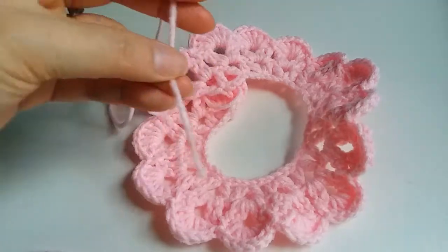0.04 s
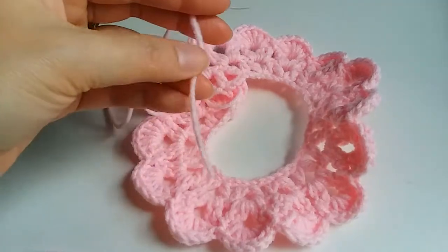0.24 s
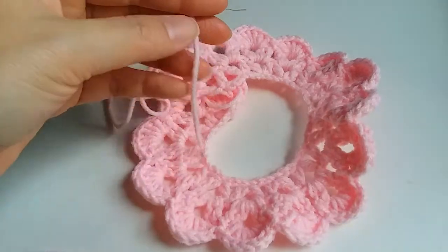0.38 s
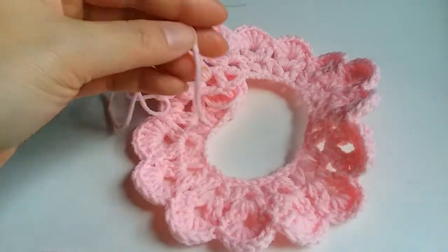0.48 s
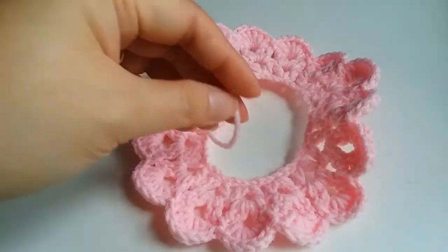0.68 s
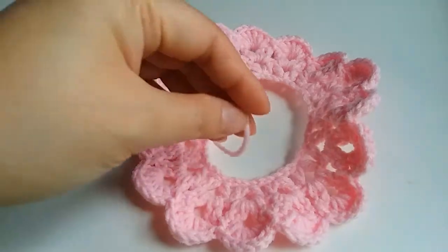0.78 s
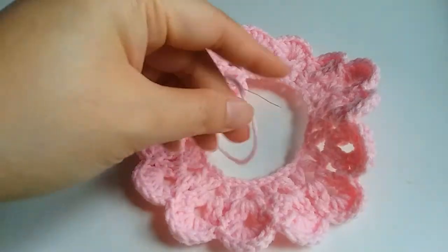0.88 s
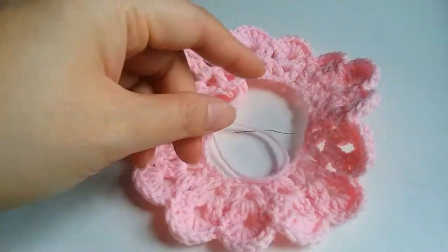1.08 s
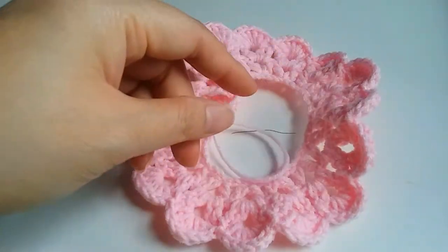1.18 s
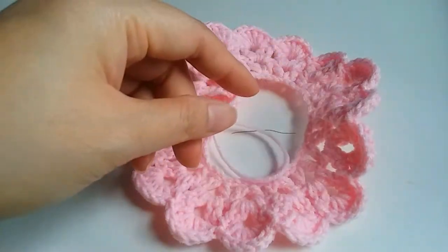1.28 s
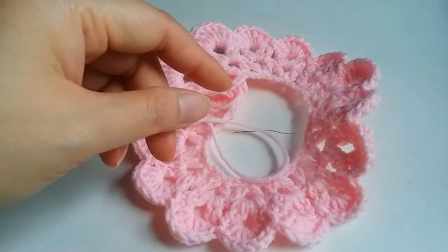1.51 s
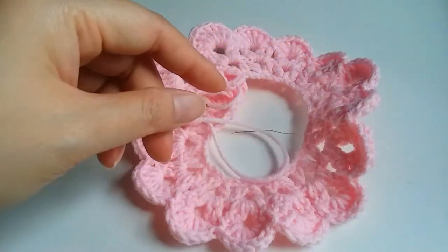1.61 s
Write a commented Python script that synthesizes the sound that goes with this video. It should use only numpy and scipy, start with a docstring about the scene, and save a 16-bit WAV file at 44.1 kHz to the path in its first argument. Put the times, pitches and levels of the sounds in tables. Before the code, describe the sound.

A few light tool clicks on a tabletop, then soft rustling of needle and yarn.

```python
"""Small tools on a table

Hard tools clack down close by and a little to the right: heavily damped pulses with quick early echoes.
Some blows excite the modes of thin steel and of the table top, which thuds. Among the clacks, yarn and
needle rustle through the fingers by stick-slip friction; at the end the hand softly bumps the table.
A small room reflects the clacks and the rustle, over a low rumble and faint hiss."""
import sys
import numpy as np
from scipy import signal
from scipy.fft import rfft, irfft
from scipy.io import wavfile
from scipy.ndimage import uniform_filter1d

SR = 44100
rng = np.random.default_rng(int(sys.argv[2]) if len(sys.argv) > 2 else 0)


def inscribe(sig):
    """Save sig as 16-bit PCM at rate SR to the path in sys.argv[1].

    A 1-D sig is mono; a 2-D sig holds one channel per row.
    Samples are clipped to [-1, 1] before scaling.
    """
    pcm = np.round(np.clip(np.atleast_2d(sig).T, -1, 1) * 32767)
    wavfile.write(sys.argv[1], SR, pcm.astype(np.int16))


N = 72765
T = np.arange(N) / SR
HZ = np.fft.rfftfreq(N, 1 / SR)

# background spectrum (frequency [Hz], relative level [dB])
BACKGROUND_SPECTRUM = [(20, -61), (35, -7.5), (59, -6), (84, -4), (140, -11), (277, -23.5), (754, -29),
                       (2000, -31.5), (4490, -35), (16000, -34.5)]
# left-right likeness of the background (frequency [Hz], correlation [0-1])
BACKGROUND_CORRELATION = [(100, 0.65), (400, 0.34), (1500, 0.16), (12000, 0.033)]
# tool clacks and their quick early echoes
# (time [s], relative level [dB], centre [Hz], treble [dB], bass [dB])
CLACKS_AND_ECHOES = [(.2050, 4.5, 2070, -12, -6), (0.2224, -18.5, 2900, -7.5, 2),
                     (0.2276, -13, 2520, -2, 6.5), (0.2992, -3.5, 2500, 7.5, -4),
                     (0.3014, 0.5, 2174, 4, -4.5), (0.318, -15.5, 2300, -2, 6),
                     (0.3232, -13.5, 2485, -2.5, 8), (0.3376, -9.5, 2300, 0, 8),
                     (0.3412, -13, 2324, 2.5, 20), (0.3603, -14, 2300, -11, 13.5),
                     (0.4067, -7.5, 2045, -3, -2.5), (0.4155, -13.5, 2150, -1.5, 0.5),
                     (0.447, -17, 2200, 2.5, 1.5), (.4695, -24, 2900, 2, -5), (0.483, -21, 3000, 4, -10),
                     (0.4905, -24, 3000, 8, 0), (0.5065, -22, 2760, 5, 8), (.5252, -25, 2387, 5, 14),
                     (.543, -23, 2300, 1, 6), (0.5646, -12.5, 2400, 3.5, 18.5),
                     (0.5709, -7, 2600, -2.5, -3.5), (0.6024, -2, 2600, 2, 9),
                     (0.7226, -25.5, 2500, -10, -12), (0.8519, -22.5, 2430, -1.5, -10),
                     (0.9592, -21, 2900, -1, -2), (0.9624, -14.5, 2950, 1, 1), (0.9698, -19, 2745, 6, 4.5),
                     (0.9719, -27, 2600, 5, 11)]
# spectrum of a clack (frequency over centre [ratio], level [dB])
CLACK_SPECTRUM = [(.3, -18.5), (.5, -16), (.75, -1), (1, 3.5), (1.35, -5.5), (1.8, -10), (2.6, -19),
                  (4, -23.5), (7, -35)]
# shading at the left microphone (frequency [Hz], gain [dB])
LEFT_SHADOW = [(200, -2.5), (1000, -4), (2000, -13), (2800, -5), (4500, -5), (8500, -39.5), (14000, -5.5)]
# reverberation time (frequency [Hz], t60 [s])
ROOM_DECAY = [(100, 0.35), (300, 0.42), (800, .21), (2200, 0.16), (5000, 0.21), (13000, 0.15)]
# colour of the reverberation (frequency [Hz], gain [dB])
ROOM_RESPONSE = [(150, -2), (900, -3), (2000, -3.5), (3200, -3), (6000, -2), (13000, 2)]
# blows that shake the table (time [s], level [dB], gain of the upper modes [dB])
TABLE_BLOWS = [(0.206, -30, -10), (0.299, -47.5, 13.5), (0.334, -37, 3.5), (0.406, -48, 7),
               (0.562, -48.5, 6)]
# modes of the table top (frequency [Hz], level [dB], t60 [s])
TABLE_MODES = [(104, 2, .17), (118, -7, .13), (158, -9, .14), (255, -4, .15), (312, -8, .12),
               (391, -3, .15), (500, -8, .1)]
# rubbing of yarn and needle (time [s], relative level [dB])
RUB_ENVELOPE = [(.21, -39.5), (.29, -49), (.33, -37.5), (.39, -56.5), (.43, -41.5), (.485, -40),
                (.505, -70.5), (.55, -42.5), (.574, -27), (.595, -41.5), (.64, -40), (.68, -53),
                (.715, -53.5), (.785, -47), (.845, -58), (.855, -45), (.895, -56.5), (.92, -46),
                (.965, -45.5), (1.03, -66.5), (1.09, -71.5)]
# colour of the rubbing (frequency [Hz], level [dB])
RUB_SPECTRUM = [(30, -33.5), (120, -16.5), (300, -16.5), (700, -22.5), (1200, -12), (1600, -4.5), (2200, 0),
                (3100, -3.5), (4500, -12), (6500, -19), (10000, -23.5), (16000, -35.5)]
# modes of the thin steel and of the needle (frequency [Hz], level [dB], t60 [s])
STEEL_MODES = [(4932, -1, .2), (7790, -8, .14), (8655, 4, .115), (11280, -14, .15), (13280, -1.5, .14),
               (14770, -13, .14)]
NEEDLE_MODES = [(5140, -2, .14), (9141, -4.5, .27), (9981, 1, .12), (14730, 6, .085)]
# blows on the steel and on the needle (time [s], level [dB], place along the length [0-1])
STEEL_STRIKES = [(.2990, -42, .1), (.3410, -47, .3), (.4065, -48, .44)]
NEEDLE_TOUCHES = [(.8630, -60, .5), (.9615, -48, .28)]
# steel sliding, then scraping on the table (time [s], level [dB])
SLIDE_ENVELOPE = [(.403, -73.5), (.415, -40.5), (.45, -48), (.485, -46), (.505, -61)]
SCRAPE_ENVELOPE = [(.47, -81), (.515, -41), (.545, -54.5), (.57, -40), (.63, -42), (.68, -111)]
# resonances of the snap (centre [Hz], half-width [Hz], level [dB])
SNAP_PEAKS = [(12800, 900, 1), (15100, 900, -2)]
# nudges of the hand (time [s], duration [s], level [dB], pitch [Hz])
HAND_BUMPS = [(1.315, 0.16, -67.5, 335.5), (1.361, 0.084, -47, 84.1), (1.452, 0.072, -51, 78.5),
              (1.588, 0.085, -55.5, 69.5)]


def amp(db):
    """Amplitude grows tenfold every 20 dB."""
    return 10 ** (np.asarray(db) / 20)


def unit(x):
    """Normalisation to rms 1."""
    return x / np.sqrt(np.mean(x ** 2) + 1e-20)


def read(points, hz):
    """Interpolation on a log-frequency axis."""
    f, value = np.transpose(points)
    return np.interp(np.log(hz + 0.00104), np.log(f), value)


def envelope(points):
    """Gain interpolated in decibels, silent outside the points."""
    return amp(np.interp(T, *np.transpose(points), left=-200, right=-200))


def peak(hz, centre_hz, width_hz):
    """A resonance curve in dB, 6 dB down at width_hz from its centre."""
    return -20 * np.log10(1 + ((hz - centre_hz) / width_hz) ** 2)


def add(mix, s, sound):
    """Superposition: a sound joins the mix at time s."""
    part = mix[max(round(s * SR), 0):][:len(sound)]
    part += sound[:len(part)]


def impulse(db):
    """Minimum phase: the causal pulse that has this spectrum."""
    log_gain = np.log(amp(np.maximum(np.r_[db, db[-2:0:-1]], -100)))
    return np.fft.ifft(np.exp(np.conj(signal.hilbert(log_gain)))).real


def background(level_db=-61.5):
    """Correlation falls with frequency: a fairly central rumble lies under a wide hiss."""
    left, independent = rfft(rng.standard_normal((2, N)))
    correlation = read(BACKGROUND_CORRELATION, HZ)
    right = correlation * left + np.sqrt(1 - correlation ** 2) * independent
    return amp(level_db) * unit(irfft(np.array([left, right]) * amp(read(BACKGROUND_SPECTRUM, HZ)), N))


def clacks(gain_db=16, treble_hz=4250, bass_hz=1080, graze_db=-24, graze_s=.0012):
    """Heavy damping: each clack or early echo is one pulse.
    Hard contact adds treble, a heavy blow bass; pulses below graze_db mostly smear into a graze."""
    out, hz, t = np.zeros(N), np.linspace(1, SR / 2, 1025), T[:1024]
    low_cut = 10 * np.log10(1 + (80 / hz) ** 2)
    for s, db, centre_hz, treble_db, bass_db in CLACKS_AND_ECHOES:
        treble = treble_db / (1 + (treble_hz / hz) ** 4)
        bass = bass_db / (1 + (hz / bass_hz) ** 4)
        colour = read(CLACK_SPECTRUM, hz / centre_hz) + treble + bass - low_cut
        pulse = amp(gain_db + db) * impulse(colour)
        scatter = rng.standard_normal(len(t)) * amp(-60 * t / .011) * (t > .0005)  # t60 of 11 ms
        graze = rng.standard_normal(len(t)) * t * np.exp(-2 * t / graze_s)
        clean_share = 1 / (1 + amp(graze_db - db) ** 2)
        force = np.sqrt(clean_share) * (t == 0) + np.sqrt(1 - clean_share) * graze / np.linalg.norm(graze)
        add(out, s, signal.fftconvolve(pulse, force + amp(-8) * scatter / np.linalg.norm(scatter)))
    return out


def direct_path(x, lag_s=0.000297):
    """Path difference and shadowing: sound from the right reaches the left later and weaker."""
    left = rfft(x) * amp(read(LEFT_SHADOW, HZ)) * np.exp(-2j * np.pi * HZ * lag_s)
    return np.array([irfft(left, N), x])


def table_thuds(rise_s=0.011, knock_hz=200):
    """Free vibration: the low modes of the struck table top swell, then decay exponentially."""
    out, t = np.zeros(N), T[:SR // 2]
    for s, thud_db, knock_db in TABLE_BLOWS:
        ring = np.zeros(len(t))
        for hz, db, t60 in TABLE_MODES:
            decay = amp(db + knock_db * (hz > knock_hz) - 60 * t / t60)
            ring += decay * np.sin(2 * np.pi * hz * rng.uniform(0.97, 1.02) * t)
        add(out, s, amp(thud_db) * (1 - np.exp(-t / rise_s)) * ring)
    return out


def stick_slip(colour_db, slips_per_s=4000, spread_db=3.5):
    """Stick-slip friction: surfaces catch and release in dense, tiny clicks of uneven size."""
    size = amp(spread_db * np.minimum(rng.exponential(1, N), 4)) * rng.choice([-1, 1], N)
    clicks = size * (rng.random(N) < slips_per_s / SR)
    return unit(irfft(rfft(clicks) * amp(colour_db), N))


def yarn_rub(gain_db=1.5):
    """Friction of yarn and needle against the fingers makes a broadband rustle."""
    return amp(gain_db) * envelope(RUB_ENVELOPE) * stick_slip(read(RUB_SPECTRUM, HZ))


def room(x, gain_db=-6.5, gap_s=0.0051, reflections_per_s=4000):
    """Reverberation: sparse reflections die away, each band at its own rate."""
    t = T[:SR // 2]
    taps = rng.standard_normal((2, len(t))) * (t > gap_s)
    taps *= rng.random((2, len(t))) < reflections_per_s / SR
    hz, age, bands = signal.stft(taps, SR, nperseg=256)
    decay = amp(-60 * age / read(ROOM_DECAY, hz)[:, None])
    tail = signal.istft(bands * decay, SR, nperseg=256)[1][:, :len(t)]
    response = amp(gain_db) * tail / np.linalg.norm(tail, axis=1, keepdims=True)
    coloured = irfft(rfft(x) * amp(read(ROOM_RESPONSE, HZ)), N)
    balance = amp([[0.5], [0]])  # left slightly louder
    return signal.fftconvolve(coloured[None], response, axes=1)[:, :N] * balance


def wall_echo(x, delay_s=.0089, gain_db=-12, cutoff_hz=3000):
    """Early reflection: a nearby surface returns one dull, delayed copy."""
    delayed = rfft(x) * np.exp(-2j * np.pi * HZ * delay_s)
    return amp(gain_db) * irfft(delayed / (1 + (HZ / cutoff_hz) ** 4), N)


def metal_ring(modes, blows, split_hz=24, twin_db=-5):
    """Beating: each mode of thin metal has a slightly higher twin; one struck at a node stays silent."""
    out, t = np.zeros(N), T[:SR // 2]
    for s, blow_db, place in blows:
        for k, (hz, db, t60) in enumerate(modes, 1):
            phase, twin_phase, spread = rng.random(3)
            mode = np.sin(2 * np.pi * (hz * t + phase))
            twin = amp(twin_db) * np.sin(2 * np.pi * ((hz + split_hz * (1 + spread)) * t + twin_phase))
            coupling = np.sin(np.pi * k * place)
            add(out, s, coupling * amp(blow_db + db - 60 * t / t60) * (mode + twin))
    return out


def steel_slide():
    """Friction drives a high resonance of sliding steel into a fuzzy ring."""
    return envelope(SLIDE_ENVELOPE) * stick_slip(peak(HZ, centre_hz=5070, width_hz=360))


def table_scrape():
    """Friction along the table drives a lower resonance: a brief, dull scrape."""
    return envelope(SCRAPE_ENVELOPE) * stick_slip(peak(HZ, centre_hz=1070, width_hz=210))


def snap(time_s=.6024):
    """Broad resonances decay fast: one hard blow carries a dry, very bright snap."""
    out, hz = np.zeros(N), np.linspace(1, SR / 2, 1025)
    peaks = [db + peak(hz, centre_hz, width_hz) for centre_hz, width_hz, db in SNAP_PEAKS]
    add(out, time_s, impulse(np.max(peaks, axis=0)))
    return out


def hand_bumps(waver=0.24):
    """Soft contact excites only low frequencies: the hand nudges the table in short, wavering swells."""
    out = np.zeros(N)
    for s, length, db, hz in HAND_BUMPS:
        t = T[:int(length * SR)]
        drift = unit(uniform_filter1d(rng.standard_normal(N), size=300))[:len(t)]
        swell = np.sin(np.pi * np.sqrt(t / length)) ** 2
        phase = 2 * np.pi * np.cumsum(hz * (1 + waver * drift)) / SR
        add(out, s, amp(db) * swell * np.sin(phase))
    return out


def scene():
    """Superposition: blows and rustle, from different spots, reverberate apart; thuds and bumps are mono."""
    blows = clacks() + metal_ring(STEEL_MODES, STEEL_STRIKES) + metal_ring(NEEDLE_MODES, NEEDLE_TOUCHES)
    rustle = yarn_rub() + steel_slide() + table_scrape()
    near = direct_path(blows + wall_echo(blows) + snap() + rustle)
    return near + room(blows) + room(rustle) + table_thuds() + hand_bumps() + background()


def record(dry, low_hz=44.7, high_hz=16200):
    """Band limiting: the microphone drops the deepest bass, and a low-pass the highest treble."""
    high_pass = signal.butter(N=4, Wn=low_hz, btype="high", fs=SR, output="sos")
    low_pass = signal.firwin(511, high_hz, window=("kaiser", 9), fs=SR)
    return signal.oaconvolve(signal.sosfilt(high_pass, dry), low_pass[None], "same")


dry = scene()
out = record(dry)
inscribe(out)
```